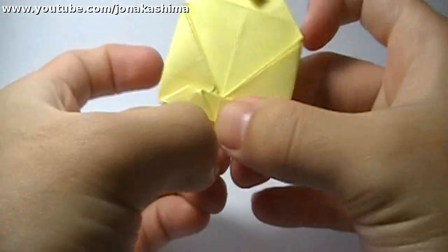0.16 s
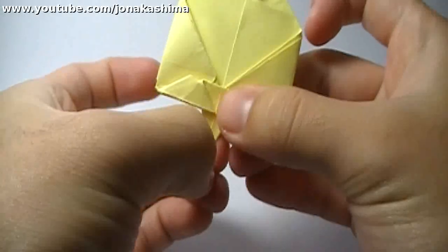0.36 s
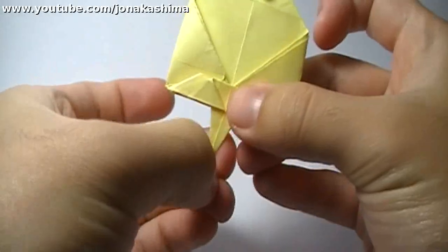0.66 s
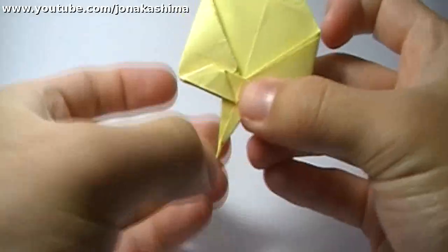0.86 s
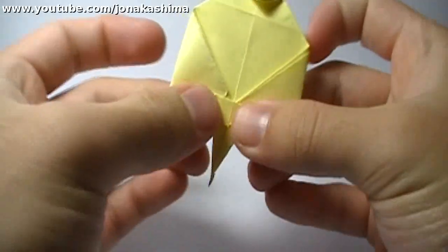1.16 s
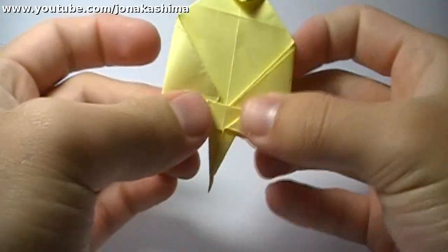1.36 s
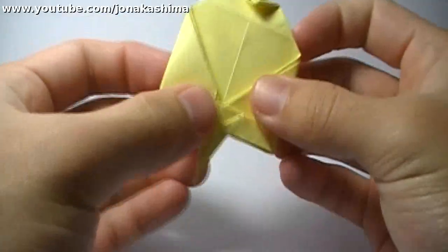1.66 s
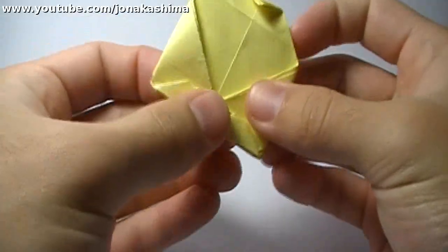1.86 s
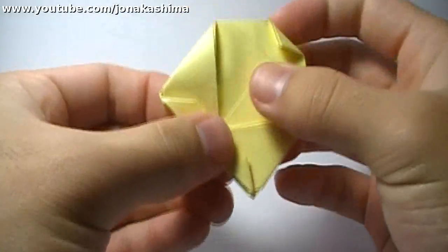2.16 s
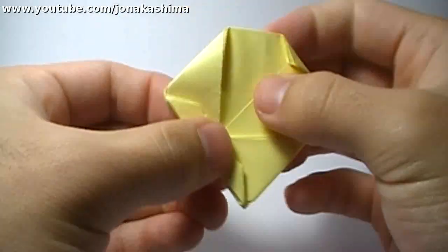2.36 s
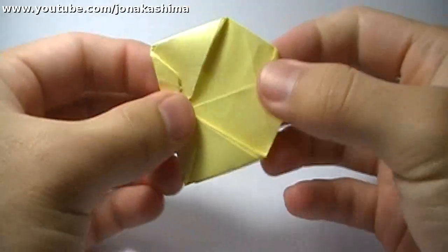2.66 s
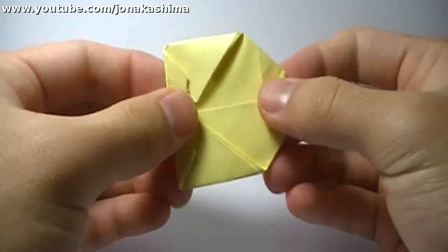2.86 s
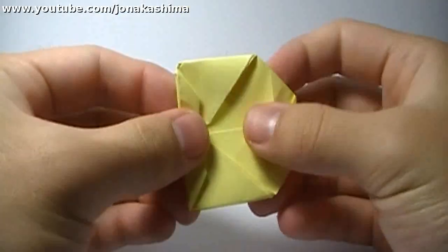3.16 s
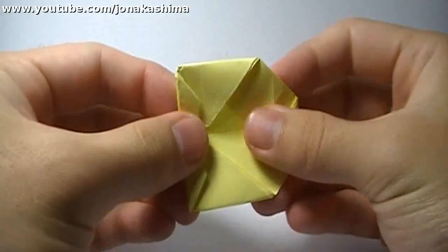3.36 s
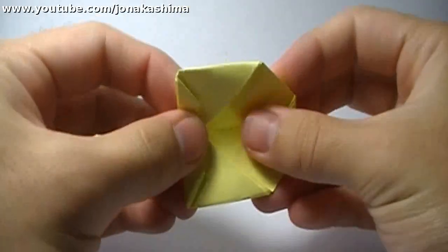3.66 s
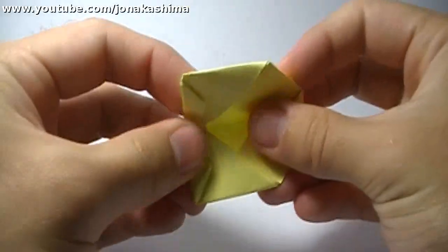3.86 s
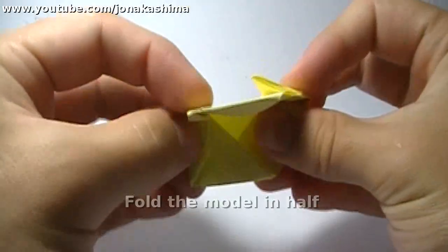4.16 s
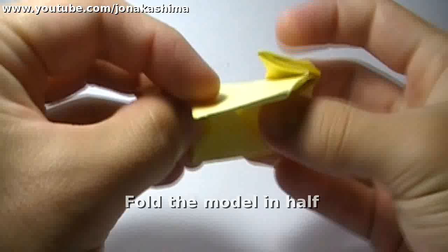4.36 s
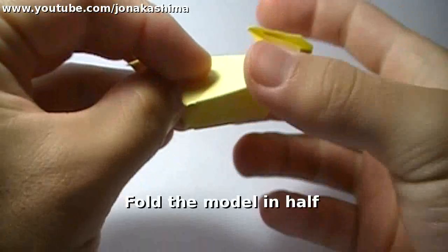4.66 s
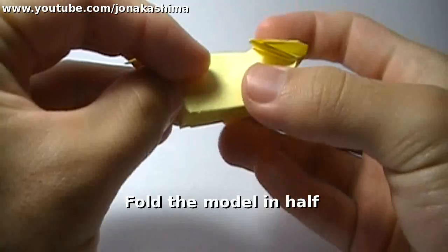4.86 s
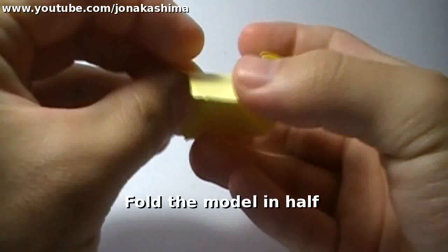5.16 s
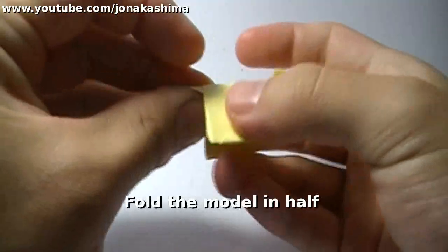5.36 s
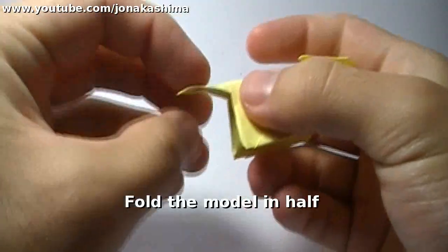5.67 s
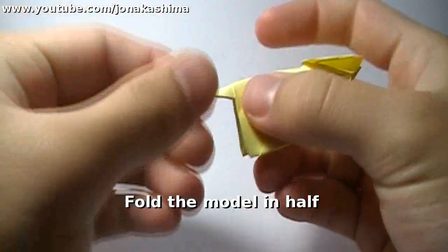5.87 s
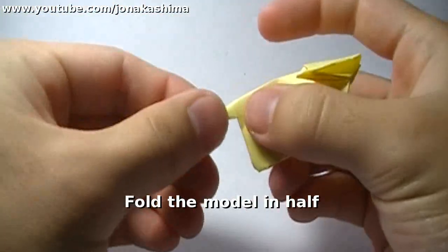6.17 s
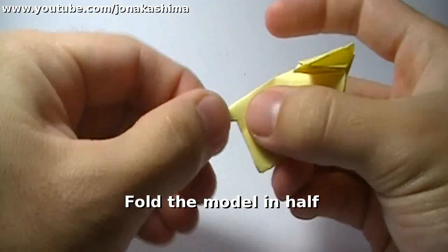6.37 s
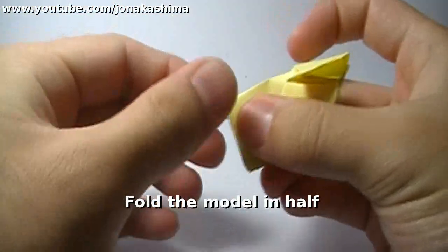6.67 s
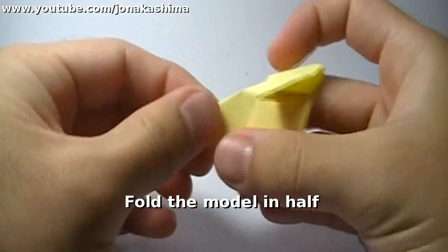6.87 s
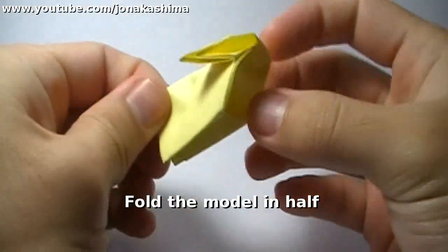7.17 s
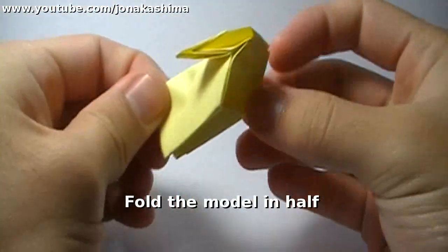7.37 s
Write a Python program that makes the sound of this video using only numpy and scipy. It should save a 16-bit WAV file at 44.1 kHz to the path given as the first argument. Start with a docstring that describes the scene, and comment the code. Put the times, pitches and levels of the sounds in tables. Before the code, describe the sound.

Small stiff paper is folded between fingers, with rustling slides, ticking creases and one hard crunch near the middle, over faint street rumble.

```python
"""A small paper model is folded by hand just in front of a stereo microphone, in a small room.
Throughout, street noise, a faint hum and a far engine (sine orders), which sinks, then speeds up.
From the start, filtered fibre slips make the slides; struck resonances make creases tick, fingertips tap.
Stiff flaps pop at 2.3 s and 4.3 s; at 4.5 s a fold crunches ever harder, then knocks shut.
From 6.9 s one smooth sweep swells while its ring sinks; a last tap and a few slides follow."""
import sys
import numpy as np
from scipy import signal
from scipy.fft import rfft, irfft, next_fast_len
from scipy.io import wavfile
from scipy.ndimage import uniform_filter1d, map_coordinates

SR = 44100
rng = np.random.default_rng(int(sys.argv[2]) if len(sys.argv) > 2 else 0)


def inscribe(sig):
    """Save sig as 16-bit PCM at rate SR to the path in sys.argv[1].

    A 1-D sig is mono; a 2-D sig holds one channel per row.
    Samples are clipped to [-1, 1] before scaling.
    """
    pcm = np.round(np.clip(np.atleast_2d(sig).T, -1, 1) * 32767)
    wavfile.write(sys.argv[1], SR, pcm.astype(np.int16))


N = 331191
TOP_HZ = 11500


def amp(db):
    """Decibels to gain."""
    return 10 ** (np.asarray(db) / 20)


def unit(x):
    """x at rms 1."""
    return x / np.sqrt(np.mean(x ** 2) + 1e-20)


def along(points, hz):
    """(Hz, value) points on a log axis."""
    f, v = np.transpose(points)
    return np.interp(np.log(hz + 1), np.log(f + 1), v)


def curve(points):
    """(s, value) points as one value per sample."""
    s, v = np.transpose(points)
    return np.interp(np.arange(N) / SR, s, v)


def wobble(rate_hz, size):
    """A smooth random curve, rate_hz knots a second."""
    knots = rng.standard_normal(int(size * rate_hz / SR) + 4)
    return map_coordinates(knots, [np.arange(size) * rate_hz / SR])


def filtered(x, response):
    """x times a complex response of frequency."""
    n = x.shape[-1]
    m = next_fast_len(n + 4096)
    return irfft(rfft(x, m) * response(np.fft.rfftfreq(m, 1 / SR)), m)[..., :n]


def struck(x, colour):
    """x through the causal minimum-phase filter whose level in dB is colour(Hz)."""
    n = x.shape[-1]
    cepstrum = irfft(np.log(amp(colour(np.fft.rfftfreq(n, 1 / SR)))))
    causal = 1 + np.sign(n // 2 - np.arange(n))
    return irfft(rfft(x) * np.exp(rfft(cepstrum * causal)))


def hump(hz, centre_hz, octaves):
    """A bell of height 1 on a log-frequency axis."""
    return np.exp(-.5 * (np.log2((hz + 1) / centre_hz) / octaves) ** 2)


def damping(hz, dull_hz, depth_db):
    """Treble loss in dB, reaching -depth_db above dull_hz."""
    return -depth_db * (1 - 1 / (1 + (hz / dull_hz) ** 16))


def ripple(depth_db, count):
    """Random peaks and dips in dB, as a function of frequency."""
    knots = depth_db * rng.standard_normal(count)
    return lambda hz: np.interp(hz, np.linspace(0, TOP_HZ, count), knots)


def spread(pair, alike):
    """Two unrelated signals become left and right with the given likeness."""
    turn = np.arccos(np.clip(alike, -1, 1)) / 2
    return np.cos(turn) * pair[0] + np.sin(turn) * pair[1] * np.array([[1], [-1]])


def add(track, s, sound, pan_db):
    """Place a stereo sound at time s, leaning left by pan_db."""
    i = max(0, round(s * SR))
    part = track[:, i:i + sound.shape[1]]
    gains = unit(amp([[pan_db / 2], [-pan_db / 2]]))
    part += (gains * sound)[:, :part.shape[1]]


def patchy(x, depth_db):
    """x with patches of random gain that drift in time and frequency, mostly in the bass."""
    hz, _, z = signal.stft(x, SR, nperseg=1024)
    field = uniform_filter1d(rng.standard_normal(z.shape[1:]), size=4, axis=0)
    field = unit(uniform_filter1d(field, size=14, axis=1))
    gain_db = depth_db * field / (1 + hz[:, None] / 1500)
    return signal.istft(z * amp(gain_db), SR, nperseg=1024)[1][:, :N]


# background colour: (frequency [Hz], relative density [dB per Hz])
AMBIENCE_COLOUR = [(20, -25.5), (55, -6), (90, -5), (155, 0.5), (250, -8.5), (400, -5), (700, -6),
                   (1100, -15.5), (1950, -14.5), (2300, -19.5), (2850, -18), (3700, -25), (7800, -29),
                   (9600, -83.5)]
# background stereo: (frequency [Hz], left-right likeness [-1 to 1])
AMBIENCE_LIKENESS = [(60, .8), (150, 0.085), (300, -0.55), (550, -0.38), (900, -0.46), (2500, 0.1),
                     (7000, 0.66)]
# street noise: (time [s], level [dB])
STREET_LEVEL = [(0, -56), (.9, -56.5), (1.5, -52.5), (3.2, -56), (5.6, -56), (7.5, -53.5)]


def background(hum_db=-71, hum_hz=538, hum_width_hz=4, patchy_db=2.0):
    """Street rumble and room air as coloured noise, plus a faint fuzzy hum of narrow-band noise."""
    def mid_side(hz):
        turn = np.arccos(np.clip(along(AMBIENCE_LIKENESS, hz), -1, 1)) / 2
        return amp(along(AMBIENCE_COLOUR, hz)) * [np.cos(turn), np.sin(turn)]

    mid, side = filtered(rng.standard_normal((2, N)), mid_side)
    air = unit(patchy(np.array([mid + side, mid - side]), patchy_db))
    air = air * amp(curve(STREET_LEVEL) + 0.6 * wobble(6, N))
    hum = filtered(rng.standard_normal(N), lambda hz: 1 / (1 + ((hz - hum_hz) / hum_width_hz) ** 2))
    return air + amp(hum_db) * unit(hum)


# engine speed before waver: (time [s], firing rate [Hz])
ENGINE_SPEED = [(0, 50), (1.3, 46), (2.4, 46), (2.9, 46.8), (3.3, 44.3), (3.75, 47), (4.4, 51.5),
                (4.85, 56.5), (5.3, 62), (6, 68.5), (6.7, 76), (7.1, 81), (7.5, 86)]
# how hard it pulls: (time [s], level before order and room gains [dB])
ENGINE_LOAD = [(0, -69.5), (1.5, -67), (2.5, -72), (2.9, -59), (3.3, -63), (3.55, -64.5), (3.7, -55.5),
               (3.9, -55), (4.05, -60), (4.5, -56), (5, -63), (5.5, -60), (6.6, -64), (7.5, -71)]
# orders swell as they cross the room's resonances: (frequency [Hz], gain [dB])
ROOM_BASS_GAIN = [(45, -15.5), (66, -10.5), (77, 2.5), (86, -4), (94, -2.5), (110, -5.5), (132, -1.5),
                  (142, 2), (162, -2.5), (185, -4.5), (205, -15), (300, -32)]
# firing orders 1 to 4: relative level [dB]
ORDER_LEVELS_DB = [-0.33, 0.73, -0.98, -1.8]


def engine(waver_db=3.0):
    """Only the lowest firing orders of the far engine, as sines, pass through the walls."""
    rate_hz = curve(ENGINE_SPEED) * (1 + 0.00537 * wobble(12, N))
    phase = 2 * np.pi * np.cumsum(rate_hz) / SR
    load_db = curve(ENGINE_LOAD)
    out = np.zeros(N)
    for order, order_db in enumerate(ORDER_LEVELS_DB, 1):
        room_db = along(ROOM_BASS_GAIN, order * rate_hz)
        level_db = load_db + order_db + room_db + waver_db * wobble(8.4, N)
        out += np.sqrt(2) * amp(level_db) * np.sin(order * phase)
    return out


# room decay: (frequency [Hz], t60 [s])
ROOM_DECAY = [(200, 0.13), (800, 0.15), (2500, 0.094), (9000, 0.036)]


def room(x, desk_db=-15, desk_delay_s=0.0086, tail_db=-14):
    """One near reflection, dulled, and a short diffuse tail of decaying noise."""
    hz, t, z = signal.stft(rng.standard_normal((2, SR // 3)), SR, nperseg=256)
    decay = amp(-60 * t / along(ROOM_DECAY, hz)[:, None])
    tail = signal.istft(z * decay, SR, nperseg=256)[1]
    tail = np.pad(spread(tail, 0.98), ((0, 0), (SR // 300, 0)))
    tail = tail / np.linalg.norm(tail[0])
    diffuse = signal.fftconvolve(x.mean(axis=0)[None], tail, axes=1)[:, :N]
    near = filtered(x, lambda f: np.exp(-2j * np.pi * f * desk_delay_s) / (1 + 1j * f / 4000))
    return amp(desk_db) * near + amp(tail_db) * diffuse


def fibres(size, rate_hz, scatter_db, smooth):
    """Friction: fibres catch and let go at random, over a smooth rub."""
    strength = amp(scatter_db * np.minimum(rng.standard_normal(size), 2))
    slips = (rng.random(size) < rate_hz / SR) * strength
    return unit(unit(slips * rng.standard_normal((2, size))) + smooth * rng.standard_normal((2, size)))


# sliding paper: (frequency [Hz], relative density [dB per Hz])
HISS_COLOUR = [(700, -26), (1700, -9.5), (2900, 2.5), (4400, 2.5), (7500, 1.5), (8500, -1.5), (9500, -8),
               (10300, -27.5), (11500, -60)]
# low body of sliding paper: (frequency [Hz], relative density [dB per Hz])
BODY_COLOUR = [(90, -23), (220, 2), (400, -4.5), (750, 4.5), (1250, -6), (1900, -0.5), (2600, -32.5),
               (5000, -63)]


def crinkle(busy_db=-66, rest_db=-79, lag_s=0.053, reach_s=0.11, clump_db=3, body_db=-5, dull_hz=9000):
    """Held paper is never still: dull fibre slips in clumps, most of them as it settles after a stroke."""
    def colour(hz):
        paper = amp(along(HISS_COLOUR, hz)) + amp(body_db + along(BODY_COLOUR, hz))
        return paper / (1 + (hz / dull_hz) ** 20)

    t = np.arange(N) / SR
    busy = sum(np.exp(-((t - start - swell - lag_s) / reach_s) ** 2) for start, swell, *_ in STROKES)
    busy = np.minimum(busy, 1)
    slips = spread(fibres(N, rate_hz=900, scatter_db=4.5, smooth=0.92), 0.26)
    paper = filtered(slips * amp(clump_db * wobble(28, N)), colour)
    return unit(paper) * amp(rest_db + (busy_db - rest_db) * busy)


# folded sheet between the hands: (resonance [Hz], width [Hz], level [dB])
FLAP_MODES = [(262, 180, -8.5), (420, 110, -2.5), (690, 140, -1), (855, 100, 2), (1150, 260, -7),
              (1590, 140, -1.5), (1775, 110, -1.5), (2300, 300, -14), (3050, 450, -8), (3900, 500, -11),
              (4400, 300, -12)]


def flap(hz):
    """Level in dB of the folded sheet's overlapping low modes."""
    power = 1e-7
    for f, width, db in FLAP_MODES:
        power = power + (amp(db) * hz * width) ** 2 / ((f * f - hz * hz) ** 2 + (hz * width) ** 2)
    return 10 * np.log10(power)


def thump(hz, octaves):
    """Colour of the whole flap shaking, most of all its modes near hz."""
    return lambda f: flap(f) + 20 * hump(f, hz, octaves)


# crack: (frequency [Hz], relative density [dB per Hz])
CRACK_COLOUR = [(300, -24), (1200, -5), (2000, 1.5), (3000, 3.5), (7800, 2), (9000, -0.5), (10200, -19),
                (11500, -29)]


def crack(hz, dull_hz, ring_db, overtone_db=7, overtone=2.94, ring_octaves=0.26, ripple_db=2):
    """Colour of the facet beside a crease; fingers pressing on it damp the treble."""
    fine = ripple(ripple_db, count=60)

    def colour(f):
        ring = ring_db * hump(f, hz, ring_octaves)
        upper = overtone_db * hump(f, overtone * hz, ring_octaves / 2)
        return along(CRACK_COLOUR, f) + ring + upper + fine(f) + damping(f, dull_hz, 15)
    return colour


def jolt(t60_s, pan_db, crumple=0.6, size=4096):
    """Paper gives way at once (an impulse), then crumples briefly (decaying fibre slips)."""
    t = np.arange(size) / SR
    slips = fibres(size, rate_hz=3000, scatter_db=-2.0, smooth=1.0)
    after = spread(slips, .92 - 0.056 * abs(pan_db)) * amp(-60 * t / t60_s)
    return crumple * t60_s / 0.007 * after / np.linalg.norm(after[0]) - (t == 0)


def burst(x):
    """x with the energy of 10 ms at rms 1."""
    return unit(x) * np.sqrt(.01 * SR / x.shape[1])


def blow(kick, *parts):
    """A jolt rings all parts (dB, colour) of the paper as one body."""
    def colour_db(f):
        return 10 * np.log10(sum((amp(db) * unit(amp(colour(f)))) ** 2 for db, colour in parts))

    gain = np.sqrt(sum(amp(db) ** 2 for db, _ in parts))
    return gain * burst(struck(kick, colour_db))


# fingertips landing on or leaving the model: (time [s], level [dB], pitch [Hz])
FINGER_TAPS = [(.497, -56.5, 470), (1.685, -50.5, 646), (2.0475, -46, 223), (3.779, -57, 480),
               (7.152, -54, 300)]


def taps(t60_s=0.016, pan_db=2):
    """A soft fingertip only thumps the flap."""
    out = np.zeros((2, N))
    for s, db, hz in FINGER_TAPS:
        add(out, s, blow(jolt(t60_s, pan_db), (db, thump(hz, octaves=1.06))), pan_db)
    return out


# creases giving way:
# (time [s], crack [dB], facet ring [Hz], thump before trim [dB], left-right [dB])
CREASE_SNAPS = [(.164, -57, 4500, -66, 2), (.3711, -66, 4000, -54, 2), (.5492, -59.5, 3740, -53, 2),
                (.7895, -55.5, 3000, -60, 3), (1.1141, -48, 3270, -60, 0), (1.6204, -46.5, 6760, -56.5, 1),
                (1.8468, -58, 6700, -69, 2), (1.8664, -52.5, 6800, -63, 1), (1.914, -62, 6500, -61, 2),
                (2.2155, -53.5, 6750, -64, 1), (2.269, -52, 6740, -59, 1), (2.3822, -42.5, 7730, -41.5, 1),
                (3.1495, -42, 7100, -50, 8), (3.9032, -45, 4670, -56, 3), (4.0853, -63, 4500, -57.5, 2),
                (4.207, -48, 6700, -55, 1), (4.2754, -45, 4360, -43, 2), (4.3079, -54, 4500, -64, 0),
                (4.3654, -52, 3500, -55, 9), (4.4393, -56, 4200, -66, 1), (4.4873, -42, 4530, -52, 5),
                (4.5012, -38, 5800, -48, 8), (4.5491, -38, 7600, -38.5, 9), (4.778, -55, 2330, -55.5, 2.5),
                (4.849, -55, 3800, -58, 0), (5.0093, -55.5, 4670, -68, 2), (5.109, -55, 4700, -55.5, 0),
                (5.4678, -41.5, 4700, -51.5, 6), (5.5476, -51.5, 4880, -60, 1),
                (5.932, -46, 2800, -60, 1.5), (6.067, -49.5, 5640, -64, 0), (6.6482, -49.5, 2750, -60, 7),
                (6.671, -41.5, 2800, -62, 6), (6.773, -50.5, 2820, -72, 1), (6.855, -47, 2600, -54.5, 0)]
# a soft crease crumples, a stiff one lets go at once: (thump before trim [dB], crumpling t60 [s])
CREASE_CRUMPLING = [(-62, 0.034), (-45.5, 0.025), (-42.5, 0.018), (-29.5, .0075)]


def snaps(thump_trim_db=-1, thump_hz=720):
    """Each crease that gives way cracks its facet and thumps the flap."""
    out = np.zeros((2, N))
    for s, crack_db, facet_hz, thump_db, pan_db in CREASE_SNAPS:
        kick = jolt(np.interp(thump_db, *np.transpose(CREASE_CRUMPLING)), pan_db)
        facet = crack(facet_hz, dull_hz=9300, ring_db=8.5)
        whole = thump(thump_hz, octaves=1.4)
        add(out, s, blow(kick, (crack_db, facet), (thump_db + thump_trim_db, whole)), pan_db)
    return out


# stiff flaps popping through:
# (time [s], flap [dB], crack [dB], buckling facet [Hz], facet ring [dB], crumpling t60 [s])
FLAP_POPS = [(2.3116, -25, -49, 1600, -0.7, 0.014), (4.3401, -37.5, -41.5, 2340, 14.5, .035)]


def pops(held_hz=490, held_db=18, dull_hz=4900, dull_db=8, facet_octaves=0.23, crumple=.38, pan_db=3):
    """A flap flips in one dry, hollow jolt; the grip stills its lowest modes and damps its treble."""
    out = np.zeros((2, N))
    for s, flap_db, crack_db, facet_hz, ring_db, t60_s in FLAP_POPS:
        def hollow(f):
            ring = ring_db * hump(f, facet_hz, facet_octaves)
            held = -held_db / (1 + (f / held_hz) ** 10)
            return flap(f) + ring + held + damping(f, dull_hz, dull_db)

        edge = crack(6300, dull_hz=8000, ring_db=6)
        add(out, s, blow(jolt(t60_s, pan_db, crumple), (flap_db, hollow), (crack_db, edge)), pan_db)
    return out


# thumb drawn off the model: (frequency [Hz], relative density [dB per Hz])
SWEEP_COLOUR = [(300, -22), (1100, -15), (2000, -12.5), (3500, -10), (4500, -1.5), (7500, -2), (9500, -5),
                (10200, -16), (11300, -65)]
SWEEP_START_S, SWEEP_END_S, SWEEP_START_DB, SWEEP_END_DB = 6.9, 7.153, -52.5, -37
SWEEP_START_HZ, SWEEP_END_HZ = 6900, 5850


def sweep(touch_s=.02, release_s=.016, ring_db=9, ring_octaves=0.12, overtone=1.39, overtone_db=4,
          judder_db=0.5, ripple_db=2, alike=0.92, pan_db=1.5):
    """A bright, thin hiss that swells; its resonances sink as the free paper grows longer."""
    out = np.zeros((2, N))
    times = [SWEEP_START_S - touch_s, SWEEP_START_S, SWEEP_END_S, SWEEP_END_S + release_s]
    t = np.arange(times[0], times[-1], 1 / SR)
    levels_db = [SWEEP_START_DB - 13, SWEEP_START_DB, SWEEP_END_DB, SWEEP_END_DB - 35]
    force_db = np.interp(t, times, levels_db)
    slips = spread(fibres(len(t), rate_hz=7000, scatter_db=2.0, smooth=1.2), alike)
    hz, s, z = signal.stft(slips, SR, nperseg=512)
    hz = hz[:, None]
    ring_hz = np.interp(times[0] + s, times[1:3], [SWEEP_START_HZ, SWEEP_END_HZ])
    ring = ring_db * hump(hz, ring_hz, ring_octaves)
    upper = overtone_db * hump(hz, overtone * ring_hz, ring_octaves / 2)
    fine = ripple(ripple_db, count=90)(hz * SWEEP_END_HZ / ring_hz)
    z = z * amp(along(SWEEP_COLOUR, hz) + ring + upper + fine)
    hiss = unit(signal.istft(z, SR, nperseg=512)[1][:, :len(t)])
    add(out, times[0], amp(force_db + judder_db * wobble(167.7, len(t))) * hiss, pan_db)
    return out


# stacked layers grinding: (frequency [Hz], relative density [dB per Hz])
CRUNCH_COLOUR = [(200, -20), (500, -15), (900, -9.5), (1250, -5.5), (2000, -11), (2900, -18), (3900, -2.5),
                 (4500, -2.5), (5200, 3.5), (6200, -1), (8000, -0.5), (9200, -11), (10500, -21.5),
                 (11500, -42)]
FOLD_START_S, FOLD_END_S, FOLD_START_DB, FOLD_END_DB = 4.487, 4.551, -36.5, -22.5
FOLD_SLIPS_PER_S, FOLD_SCATTER_DB, FOLD_SMOOTH = 3600, 1.2, .85
KNOCK_S, KNOCK_CRACK_DB, KNOCK_FACET_HZ, KNOCK_THUMP_DB = 4.5554, -26.5, 5300, -29.5


def fold(attack_s=.003, release_s=0.019, judder_db=0.4, ripple_db=3, alike=0.55, pan_db=10):
    """The stacked layers grind over each other ever harder, in coarse slips, then knock shut."""
    out = np.zeros((2, N))
    times = [FOLD_START_S - attack_s, FOLD_START_S, FOLD_END_S, FOLD_END_S + release_s]
    t = np.arange(times[0], times[-1], 1 / SR)
    levels_db = [FOLD_START_DB - 17, FOLD_START_DB, FOLD_END_DB, FOLD_END_DB - 30]
    force_db = np.interp(t, times, levels_db)
    slips = spread(fibres(len(t), FOLD_SLIPS_PER_S, FOLD_SCATTER_DB, FOLD_SMOOTH), alike)
    fine = ripple(ripple_db, count=90)
    crunch = unit(filtered(slips, lambda hz: amp(along(CRUNCH_COLOUR, hz) + fine(hz))))
    add(out, times[0], amp(force_db + judder_db * wobble(319, len(t))) * crunch, pan_db)

    kick = jolt(0.0067, pan_db, crumple=1.0)
    facet = crack(KNOCK_FACET_HZ, dull_hz=9600, ring_db=11.5, overtone_db=13.5, overtone=1.49,
                  ring_octaves=0.21)
    whole = thump(hz=1144, octaves=1.8)
    add(out, KNOCK_S, blow(kick, (KNOCK_CRACK_DB, facet), (KNOCK_THUMP_DB, whole)), pan_db)
    return out


SHEET_HZ, SHEET_OCTAVES = 7140, 0.21  # the ring that every grip shares
SINK_OCTAVES_PER_S = 1.22


def friction(slips, ring_hz, ring_db, body_db, pan_db, sheet_db, ring_octaves=0.15, ripple_db=3.5, count=3):
    """Fibre slips heard through the sheet: hiss with two sinking rings, over a low body."""
    t = np.arange(slips.shape[1]) / SR
    # paper close to one capsule sounds less alike in the two
    rub = spread(slips, np.clip(.98 - 0.045 * abs(pan_db), .45, .95))
    # each stroke gets its own random fine unevenness of spectrum
    fine = ripple(ripple_db, count=130)

    def rings(hz):
        own = ring_db * hump(hz, ring_hz, ring_octaves)
        shared = sheet_db * hump(hz, SHEET_HZ, SHEET_OCTAVES)
        return own + shared + fine(hz)

    # crossfade through count fixed filters, each with lower rings
    hiss, stages_s = 0, np.linspace(0, t[-1], count)
    for stage_s, weights in zip(stages_s, np.eye(count)):
        shift = 2 ** (SINK_OCTAVES_PER_S * (stage_s - t.mean()))
        stage = unit(filtered(rub, lambda hz: amp(along(HISS_COLOUR, hz) + rings(hz * shift))))
        hiss = hiss + np.interp(t, stages_s, weights) * stage
    body = filtered(spread(slips, 0.63), lambda hz: amp(along(BODY_COLOUR, hz) + fine(hz) / 2))
    return unit(hiss) + amp(body_db) * unit(body)


# slides: (start [s], swelling [s], fading [s], crest [dB], ring of the free paper [Hz], ring [dB],
#          body re hiss before trim [dB], left-right [dB])
STROKES = [(0, 0.0031, 0.015, -60, 6500, -5, -10, 2), (.16, .011, 0.048, -54.5, 6000, 2, -4, 1),
           (.24, 0.08, 0.05, -58, 4340, 3.5, 4, 2), (.68, 0.011, 0.025, -66.5, 4000, 6, 11.5, 3),
           (.79, .012, 0.049, -50, 3600, 8.5, -3, 5), (1.118, .025, 0.0062, -54.5, 2930, 3, 2, 6),
           (1.35, 0.012, 0.033, -57.5, 7400, -2, -4, 1), (1.46, 0.14, 0.013, -52.5, 7240, 5, -17, 1.5),
           (1.678, .013, 0.035, -54, 7800, 4, -15, 1.5), (1.761, 0.084, 0.041, -56.5, 2920, 0, -6, 2),
           (1.904, 0.031, 0.013, -51.5, 5300, 1, -3.5, 1.5), (2.031, 0.028, 0.006, -51, 7500, 4, -23, 1),
           (2.141, 0.18, 0.07, -55, 6960, 1, -3, 2), (2.425, 0.046, .08, -53.5, 2420, -1, -4.5, 1),
           (2.51, 0.1, 0.0095, -45.5, 2400, 3, -9.5, 2), (2.63, 0.035, 0.035, -64, 3600, 3, -6, 1),
           (2.757, .015, 0.051, -56, 6350, 2, -3.5, 1.5), (2.939, 0.022, .032, -60.5, 6500, 3, -8, 3),
           (3.08, .036, .035, -43, 7840, 4.5, -7, 5.5), (3.14, 0.019, 0.047, -43, 6800, 7, -10.5, 1),
           (3.325, 0.048, 0.05, -57.5, 2920, 10, -16, 3), (3.645, 0.04, 0.041, -51, 5200, 2, -12, 1.5),
           (3.778, 0.0041, 0.007, -39, 5400, 3, -23, 0.5), (3.893, 0.014, .1, -46.5, 4700, 2.5, -8.5, 2.5),
           (4.08, .012, 0.085, -56, 4060, 7, -3, 2), (4.176, 0.0031, 0.0072, -43, 4340, 7, -8, 1),
           (4.2058, 0.0036, 0.0057, -44, 4600, 7, -8, 2), (4.28, .035, 0.016, -55, 4800, 1, -5, 3),
           (4.346, 0.017, .046, -46, 2390, -4, -3, 3.5), (4.602, 0.0082, 0.014, -51.5, 3760, 11, -8, 1.5),
           (4.765, .12, .035, -56.5, 3650, 11, 1.5, 1.5), (5.045, 0.019, 0.024, -62, 6500, 10, -4, 3),
           (5.112, .07, 0.092, -47, 4400, 3.5, -14, 1.5), (5.25, 0.037, 0.17, -49.5, 4430, 4, -3.5, 1.5),
           (5.456, .016, .024, -37.5, 8000, 6, -15.5, 5), (5.611, .027, 0.0078, -48.5, 6170, 3, -13, 1),
           (5.682, 0.016, .01, -58, 6500, 19, -5, 1), (5.758, 0.0072, 0.0071, -52, 2900, 10, -3, 2),
           (5.82, .015, .011, -54, 2980, 4, .5, 3), (5.931, 0.0042, 0.027, -53, 3080, 6, -3, 3),
           (5.974, .015, .011, -51, 6800, 8, -9, 2), (6.64, 0.033, .018, -47, 8500, 4.5, -8.5, 7),
           (6.771, .005, 0.16, -52.5, 7750, 2, -9, 2.5), (7.2, .05, 0.061, -61, 4700, 9, -2, 1),
           (7.377, 0.0054, 0.029, -54, 5030, 9, -12, 1), (7.449, .032, 0.052, -49.5, 4240, 6, -20, 1)]
# shared ring level by amount of low body, strongest for thin slides, least near -7 dB:
# (body before trim [dB], shared ring [dB])
SHARED_RING_BY_BODY = [(-19, 6), (-7, 4.5), (-6.5, 5.5)]
# a slide gains in force the longer it swells, then eases and lets go
TOUCH_S, RISE_DB, RISE_DB_PER_S, EASE_DB, RELEASE_S = .004, 7.5, 24, 8, .016
SOFTNESS = .3  # slow slides touch and let go slowly: share of swell, twice that of fade


def slides(judder_db=1.12, swell_db=0.7, body_trim_db=-2):
    """Each stroke drags fibres over the sheet: soft touch, swell, ease, soft release."""
    out = np.zeros((2, N))
    for start, swell, fade, crest_db, ring_hz, ring_db, body_db, pan_db in STROKES:
        touch, release = TOUCH_S + SOFTNESS * swell, RELEASE_S + 2 * SOFTNESS * fade
        times = start - touch + np.cumsum(np.abs([0, touch, swell, fade, release]))
        t = np.arange(times[0], times[-1], 1 / SR)
        shape_db = np.interp(t, times[1:4], [-RISE_DB - RISE_DB_PER_S * swell, 0, -EASE_DB])
        contact = np.interp(t, times, [0, 1, 1, 1, 0]) ** 2
        unsteady_db = judder_db * wobble(172.2, len(t)) + swell_db * wobble(25.6, len(t))
        grip = contact * amp(crest_db + shape_db + unsteady_db)
        slips = fibres(len(t), rate_hz=3200, scatter_db=2.4, smooth=1.17)
        sheet_db = np.interp(body_db, *np.transpose(SHARED_RING_BY_BODY))
        rub = friction(slips, ring_hz, ring_db, body_trim_db + body_db, pan_db, sheet_db)
        add(out, times[0], grip * rub, pan_db)
    return out


def scene(engine_pan_db=4, street_pan_db=1.2):
    """The paper in its room, over a background that leans to the left."""
    paper = crinkle() + taps() + snaps() + pops() + sweep() + fold() + slides()
    out = paper + room(paper)
    add(out, 0, engine() * np.ones((2, 1)), engine_pan_db)
    add(out, 0, background(), street_pan_db)
    return out


def record(dry):
    """The recorder keeps nothing above its band limit."""
    return filtered(dry, lambda hz: 1 / (1 + (hz / TOP_HZ) ** 80))


dry = scene()
out = record(dry)
inscribe(out)
```